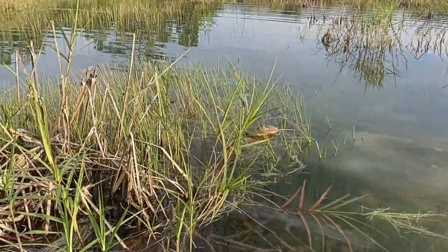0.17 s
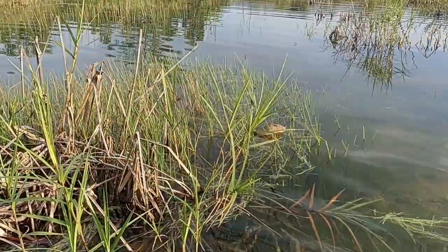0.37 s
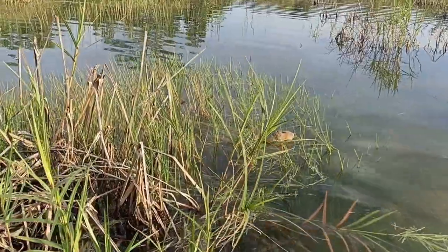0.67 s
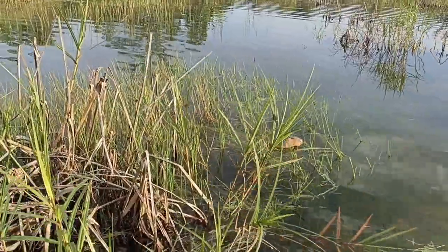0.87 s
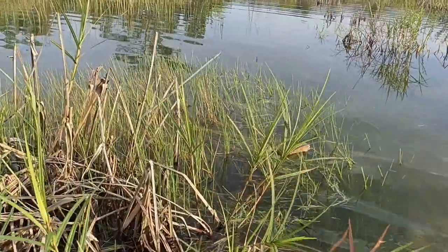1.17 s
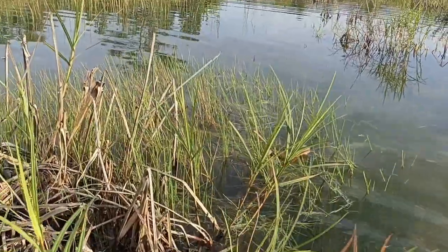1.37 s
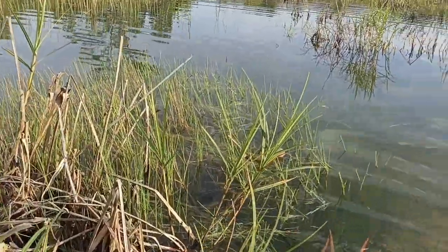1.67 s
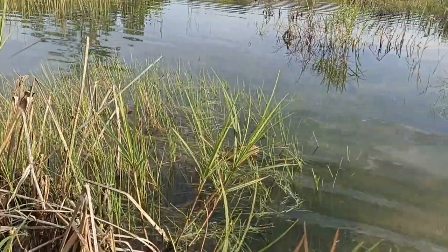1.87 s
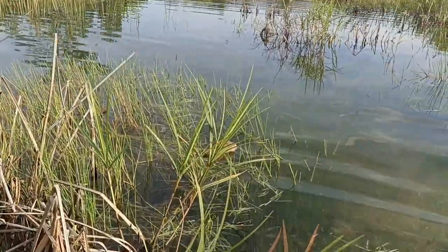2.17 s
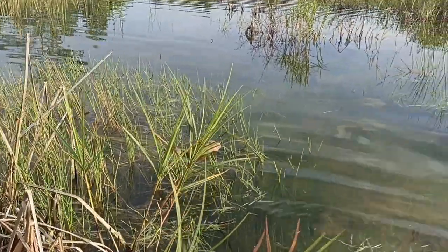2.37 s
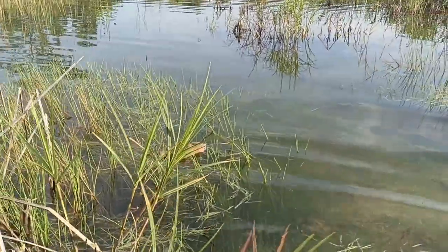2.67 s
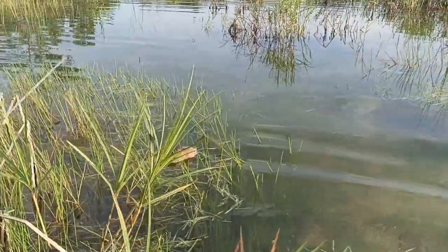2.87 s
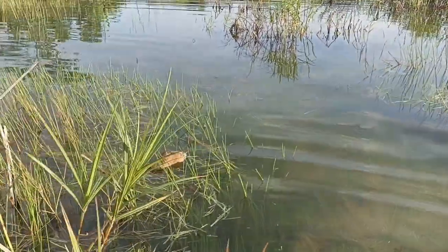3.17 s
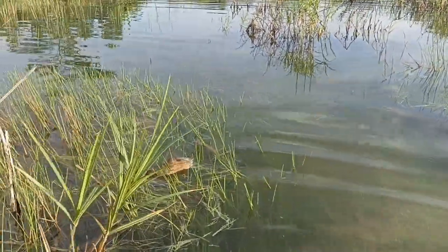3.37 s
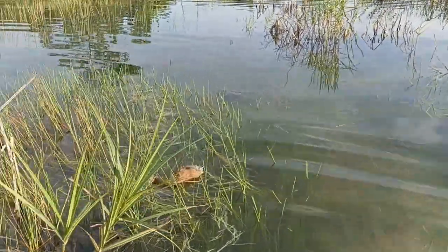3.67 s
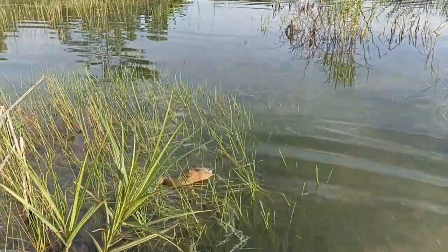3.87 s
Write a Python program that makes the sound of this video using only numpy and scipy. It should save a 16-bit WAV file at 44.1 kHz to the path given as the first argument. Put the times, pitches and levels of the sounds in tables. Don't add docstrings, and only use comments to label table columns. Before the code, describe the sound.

At a reedy pond outdoors, a distant engine and traffic rumble runs steadily under a soft wash of far frogs and a thin high insect hiss. A small bird gives brief bent whistles, tumbling around one second and again soon after. A dry stem snaps faintly, then a nearby frog fires five quick, dry rattles, strongest on the right. A soft thud from handling ends the wide stereo take.

```python
import sys
import numpy as np
from scipy import signal
from scipy.fft import rfft, irfft
from scipy.io import wavfile
from scipy.ndimage import uniform_filter1d

SR = 44100
rng = np.random.default_rng(int(sys.argv[2]) if len(sys.argv) > 2 else 0)


def voltage_ratio(level):
    return 10 ** (np.asarray(level, float) / 20)


def dump_mix(stems):
    frames = np.atleast_2d(stems).T
    limited = np.clip(frames, -1, 1)
    pcm = np.round(limited * 32767).astype(np.int16)
    wavfile.write(sys.argv[1], SR, pcm)


N = 177458


def frog():
    # (first_ms, middle_ms,
    # closing_ms)
    calls = [
        (2.7400, -30, 2.53, 2.18, 1.38),
        (2.8864, -30, 1.73, 2.55, 1.65),
        (3.0362, -30, 1.72, 2.7, 1.4),
        (3.1913, -28.5, 1.95, 2.45, 1.45),
        (3.3492, -29, 2, 2.35, 1.4),
    ]
    # pitch_hz, time to fall 60 dB (t60_s), left_db, right_db
    ringing = [(3516, 0.015, -13, 2), (3540, 0.01, -26, -9.5), (3150, 0.0072, -9.5, -1),
               (2600, 0.011, -22, -6.5), (4240, 0.0093, -4.5, -11), (1930, 0.0062, -23, -17),
               (1510, 0.0079, -10, -7), (1180, 0.0094, -17, -12)]
    fade_db, tiring_db_per_s = -3, -5.5
    pulses = np.zeros(N)
    k = np.arange(22)
    for s, db, first, middle, closing in calls:
        chance = rng.standard_normal((22, 2))
        gap_numbers = [1, 3, 4, 6, 7.5, 12, 20]
        gaps_ms = [first, middle, .95 * middle, .75 * middle, 1.05 * closing, .95 * closing, 1.13]
        spacing = np.interp(k, gap_numbers, gaps_ms)
        jitter_ms = 0.029 * chance[:, 0] * (k > 0)
        at = s + (np.cumsum(spacing) - spacing + jitter_ms) / 1000
        call_fade_db = (fade_db + tiring_db_per_s * (s - calls[0][0])) * k / 12
        trail_db = np.where(k > 12, -3.5 - 0.88 * (k - 12), 0)
        pulse_db = db + call_fade_db + trail_db + 1.8 * chance[:, 1]
        pulses[np.round(at * SR).astype(int)] = voltage_ratio(pulse_db)

    t = np.arange(1500) / SR
    damping = np.array([[1.4], [1]])
    ring = np.zeros((2, len(t)))
    for hz, t60, left_db, right_db in ringing:
        level_db = np.array([[left_db], [right_db]]) - 60 * t * damping / t60
        ring += voltage_ratio(level_db) * np.sin(2 * np.pi * hz * t)
    sac_band = signal.cheby2(6, 40, [750, 4950], "band", fs=SR, output="sos")
    ring = signal.sosfilt(sac_band, ring)
    ring = 1.68 * np.diff(ring, prepend=0)
    ports = signal.fftconvolve(pulses[None], ring, axes=1)[:, :N]
    ports = np.array([ports[0], delayed(ports[1], 13.07)])
    return ports + voltage_ratio(-12.5) * bank(ports, t60=0.14)


def bird():
    # start_s, length_s, middle_hz, peak_db
    rises = [(0.041, 0.014, 3600, -48), (0.054, .01, 2780, -46), (.198, .013, 2350, -49),
             (0.237, 0.015, 3550, -42.5), (1.672, .008, 3520, -46), (1.682, .009, 2560, -51),
             (1.692, 0.0082, 2320, -46.5), (1.707, 0.028, 3270, -46), (1.842, .006, 3650, -54),
             (2.394, 0.013, 2380, -50), (2.552, 0.022, 3250, -48.5), (2.656, 0.0054, 3070, -51),
             (2.872, .008, 2510, -51), (3.092, 0.0097, 2920, -43), (3.11, .014, 3160, -40),
             (3.124, 0.019, 2450, -45), (3.156, 0.017, 2330, -50), (3.272, .01, 3500, -50),
             (3.279, .011, 2720, -44.5), (3.385, .012, 2265, -48), (3.406, 0.019, 2320, -43),
             (3.43, 0.0081, 2600, -45)]
    # start_s, length_s, middle_hz, peak_db
    falls = [(1.69, .008, 3080, -51), (1.849, .007, 3650, -46), (1.677, .006, 3600, -50),
             (1.835, .01, 1970, -50), (2.606, 0.018, 3210, -49), (2.718, .034, 3260, -50.5),
             (3.101, .007, 3030, -41), (3.135, .008, 3050, -42), (3.142, 0.0109, 2520, -39),
             (3.266, .0052, 2700, -46), (3.4, .006, 2550, -48), (3.442, .005, 2660, -41)]
    # start_s, length_s, middle_hz, ends_minus_middle_hz, peak_db
    bends = [(2.575, .012, 2460, 12, -48.5), (0.061, 0.016, 3690, -270, -48), (.22, .013, 2420, -150, -48),
             (0.256, 0.028, 2530, 180, -48.5), (0.573, 0.076, 2730, -23, -57),
             (0.64, 0.026, 2600, -350, -51), (.953, 0.018, 2600, 15, -47.5),
             (1.231, .009, 3790, 170, -48.5), (1.247, 0.016, 3490, 110, -53),
             (1.258, .017, 2600, -250, -52), (1.274, 0.017, 3390, 120, -50),
             (1.815, 0.014, 2355, -80, -46.5), (1.86, 0.02, 2650, -600, -49.5),
             (1.88, 0.02, 3150, 300, -55), (1.886, 0.0086, 2480, -390, -50),
             (2.59, 0.014, 2540, -15, -48.5), (2.586, 0.02, 3300, 162, -45.5),
             (2.628, 0.027, 2300, 380, -50.5), (2.66, 0.024, 2560, 920, -47.5),
             (2.685, .027, 3130, 450, -48.5), (2.915, 0.044, 3300, -80, -43.5),
             (3.289, 0.016, 3400, -130, -49.5), (3.441, 0.039, 2342, -8, -41)]
    # start_s, stretch (times as long), level_db
    tumbles = [
        (.954, .98, -46),
        (1.417, 1.02, -44),
    ]
    flutter, quiver = wandering(span=90), wandering(span=90)
    sung = [note(*row, sweep_hz=500, bend_hz=-6000 * row[1]) for row in rises]
    sung += [note(*row, sweep_hz=-780, bend_hz=30) for row in falls]
    sung += [note(s, length, hz, db, 0, bend_hz) for s, length, hz, bend_hz, db in bends]
    sung += [tumble(*row) for row in tumbles]

    song = np.zeros(N)
    for s, hz, db in sung:
        hz = hz * (1 + .006 * quiver[round(s * SR):][:len(hz)])
        edges = signal.windows.tukey(len(hz), min(0.003 * SR / len(hz), .6))
        whistle = np.sin(2 * np.pi * np.cumsum(hz) / SR)
        add(song, s, voltage_ratio(db) * edges * whistle)
    t = np.arange(N) / SR
    song *= voltage_ratio(np.interp(t, [1.9, 2.5], [2.4, 1.1]) * flutter)
    ports = np.array([voltage_ratio(-14.0) * song, delayed(song, 22.15)])
    echo_db = np.interp(t, [1.9, 2.5], [-9, -13])
    return ports + voltage_ratio(echo_db) * bank(ports, t60=.1)


def note(s, length, hz, db, sweep_hz, bend_hz):
    u = np.linspace(-1, 1, round(length * SR))
    pitch_hz = hz + sweep_hz / 2 * u + bend_hz * u ** 2
    release_db = -9 * ((u + 1) / 2) ** 4 * min(length / .04, 1) ** 2
    return s, pitch_hz, db + release_db


def tumble(s, stretch, db):
    # time_ms, pitch_hz, level_db
    phrase = [
        (0, 3250, -1),
        (7, 4000, 0.5),
        (11, 3230, -4),
        (16, 4200, -4),
        (24, 3150, 1.5),
        (32, 3700, -1),
        (47, 2850, -10),
        (59, 2060, -1),
        (71, 2620, -3),
    ]
    ms, hz, shape_db = np.transpose(phrase)
    now = np.arange(0, ms[-1], 1000 / SR / stretch)
    pitch_hz = uniform_filter1d(np.interp(now, ms, hz), size=70)
    return s, pitch_hz, db + np.interp(now, ms, shape_db)


def bank(x, t60):
    taps = np.zeros((2, 12000))
    at = np.arange(400, 11980, 20) + rng.integers(0, 20, (2, 579))
    np.put_along_axis(taps, at, rng.choice([-1., 1.], at.shape), 1)
    taps *= voltage_ratio(-60 * np.arange(12000) / SR / t60)
    return signal.fftconvolve(x, taps / np.linalg.norm(taps[0]), axes=1)[:, :N]


def reeds():
    # start_s, level_db, length_s, low_edge_hz, high_edge_hz
    snaps = [
        (2.5793, -51, .002, 3500, 10000),
        (2.580, -48.5, .008, 10500, 16000),
        (1.508, -66, .006, 5000, 13000),
        (2.553, -60, .003, 3500, 6500),
        (.03, -57, .003, 3600, 6000),
        (.6, -60, .002, 4000, 6000),
    ]
    # start_s, pitch_hz, level_db, time to fall 60 dB (t60_s)
    bump = (3.832, 290, -34, .06)
    out = np.zeros((2, N))
    for s, db, length, *edges_hz in snaps:
        puff = rng.standard_normal(600) * (np.arange(600) < length * SR)
        puff = signal.sosfilt(signal.butter(2, edges_hz, "band", fs=SR, output="sos"), puff)
        right_extra_db = 5.0 if edges_hz[0] < 1e4 else -13.0
        add(out, s, voltage_ratio(np.array([[db], [db + right_extra_db]])) * puff)
    s, hz, db, t60 = bump
    t = np.arange(3000) / SR
    onset = 1 - np.exp(-t / 0.0011)
    add(out, s, voltage_ratio(db - 60 * t / t60) * np.sin(2 * np.pi * hz * t) * onset)
    return out


def insects():
    # pitch_hz, then left_db and right_db (dB per Hz)
    hiss_color = [(7340, -135, -120), (7170, -111, -103), (8320, -99, -92), (8635, -99, -94),
                  (8870, -106, -105), (9480, -121, -121), (9100, -121, -123), (10480, -116, -123),
                  (11930, -105, -113), (12600, -105, -115), (14000, -106, -110), (15500, -104, -105),
                  (15700, -125, -125)]
    # time_s, throb_depth_db
    in_step = [(0, 1.5), (.45, 2.2), (.85, .9), (1.3, 2), (1.85, .9), (2.25, 2.6), (3.0, 1.8), (3.3, 2.8),
               (4.02, 2.6)]
    throb_per_s, crest_s = 6.06, 2.035
    t = np.arange(N) / SR
    throb_db = np.interp(t, *np.transpose(in_step)) * np.cos(2 * np.pi * throb_per_s * (t - crest_s))
    hiss = noise(hiss_color, patchy_db=1.2, flicker_db=-0.17, size=512)
    high = signal.sosfiltfilt(signal.butter(4, 10000, "high", fs=SR, output="sos"), hiss)
    return hiss + high * (voltage_ratio(throb_db) - 1)


def chorus():
    # pitch_hz, then left_db and right_db (dB per Hz)
    wash_color = [(900, -120, -110), (1320, -106, -96.5), (2050, -99, -89.5), (2920, -102, -92.5),
                  (3300, -99, -90.5), (3530, -101, -88), (3795, -103, -93), (4250, -107, -104),
                  (5080, -110, -109), (5840, -112, -104), (7060, -115, -102), (6930, -125, -107),
                  (7860, -140, -130)]
    # time_s, level_db
    wash_swell = [(0.0, -59), (0.4, -61), (0.86, -60.5), (1.72, -59.3), (2.04, -61.5), (3.41, -60.5),
                  (3.5, -62), (4.02, -63.5)]
    s, level_db = np.transpose(wash_swell)
    swell_db = np.interp(np.arange(N) / SR, s, level_db - level_db.mean())
    return voltage_ratio(swell_db) * noise(wash_color, patchy_db=1.78, flicker_db=0.8, size=512)


def drone():
    # pitch_hz, left_db and right_db (dB per Hz), left-right likeness (0-1)
    rumble = [(25.7, -94, -107, 0.7), (50.3, -98, -76.5, .95), (68.6, -79.5, -84, 1), (88, -64.5, -64.5, 1),
              (165, -67, -66.5, 0.94), (295, -69, -70.5, 0.92), (441, -79, -79.5, 0.48),
              (577, -86, -82.5, 0.48), (910, -92, -88.5, 0.86), (1236, -95, -87.5, 0.68),
              (1530, -95.5, -91.5, 1), (2300, -108, -100, 0.6), (3000, -125, -120, 0.9)]
    low = noise(rumble, patchy_db=1.24, flicker_db=0.25, size=2048) + engine()
    return np.array([delayed(low[0], 13.96), low[1]])


def engine():
    # time_s, level_db
    exhaust = [(0, -55.5), (.15, -47.5), (.27, -52.5), (.45, -43.5), (.93, -57), (1.22, -45.5), (1.4, -51),
               (1.9, -44), (2.1, -54), (2.5, -44.5), (2.67, -51.5), (2.95, -46.5), (3.2, -52),
               (3.45, -49.5), (4.02, -48.5)]
    # order (multiple of shaft speed), level_db, share of the exhaust swell (0-1),
    # random fading_db
    orders = [(5, -52.5, 0.01, 3.5), (6, -51.5, 0, 4), (9, -47.5, 1, 0.3), (10, -56, 0.47, 2.5),
              (18, -57.5, 0.47, 3)]
    shaft_hz, fade_s = 17.05, 0.098
    s, level_db = np.transpose(exhaust)
    swell_db = np.interp(np.arange(N) / SR, s, level_db - level_db.mean())
    turns = np.cumsum(shaft_hz * (1 + 0.00646 * wandering(span=9000))) / SR
    out = np.zeros(N)
    for k, db, share, fade_db in orders:
        hum_db = db + share * swell_db + fade_db * wandering(int(fade_s * SR))
        out += np.sqrt(2) * voltage_ratio(hum_db) * np.sin(2 * np.pi * (round(k) * turns + rng.random()))
    return out


def noise(table, patchy_db, flicker_db, size):
    f, *columns = np.transpose(table)
    white = rng.standard_normal((2, N + size))
    hz, t, z = signal.stft(white, SR, nperseg=size, noverlap=size * 3 // 4)
    left_db, right_db, *same = (np.interp(np.log(hz + 1), np.log(f), c)[:, None] for c in columns)
    if same:
        like = np.clip(same[0], 0, 1)
        z[1] = like * z[0] + np.sqrt(1 - like ** 2) * z[1]
    patches = uniform_filter1d(rng.standard_normal(z.shape[1:]), size=9, axis=0)
    patches = evened(uniform_filter1d(patches, size=9, axis=1))
    flicker = evened(uniform_filter1d(rng.standard_normal(len(t)), size=4))
    inside = ((hz > .7 * f[0]) & (hz < 1.3 * f[-1]))[:, None]
    level_db = np.array([left_db, right_db]) + patchy_db * patches + flicker_db * flicker
    z *= inside * voltage_ratio(level_db) * np.sqrt(SR / 2)
    return signal.istft(z, SR, nperseg=size, noverlap=size * 3 // 4)[1][:, :N]


def wandering(span):
    smooth = uniform_filter1d(rng.standard_normal(N), size=span)
    return evened(uniform_filter1d(smooth, size=span))


def evened(x):
    return x / np.sqrt(np.mean(x ** 2) + 1e-20)


def delayed(x, samples):
    turn = np.exp(-2j * np.pi * np.fft.rfftfreq(x.shape[-1]) * samples)
    return irfft(rfft(x) * turn, x.shape[-1])


def add(mix, s, sound):
    part = mix[..., round(s * SR):][..., :sound.shape[-1]]
    part += sound[..., :part.shape[-1]]


def scene():
    return frog() + bird() + reeds() + insects() + chorus() + drone()


def muted(x):
    # pitch_hz, threshold_db (dB per Hz)
    threshold = [(4000, -122), (4800, -111), (5500, -113), (7000, -114), (8000, -120), (9100, -114),
                 (10400, -115), (11300, -117), (12200, -126)]
    hz, t, z = signal.stft(x, SR, nperseg=2048, noverlap=1536)
    bands = z[:, :1024].reshape(2, 256, 4, -1)
    power = uniform_filter1d((abs(bands) ** 2).mean(2), size=3, axis=2) * 2048 / .75 / SR
    chance = rng.standard_normal((2, 43, len(t))) + .6 * rng.standard_normal((43, len(t)))
    waver = np.repeat(evened(uniform_filter1d(chance, size=4, axis=2)), 6, axis=1)[:, :256]
    limit_db = np.interp(hz[2:1024:4], *np.transpose(threshold), left=-200, right=-200)[:, None]
    limit_db = limit_db + 4.5 * waver
    z[:, :1024] *= np.repeat(10 * np.log10(power + 1e-30) > limit_db, 4, axis=1)
    return signal.istft(z, SR, nperseg=2048, noverlap=1536)[1][:, :N]


def roll_off(x):
    return signal.sosfilt(signal.butter(12, 15620, fs=SR, output="sos"), x)


def record(dry):
    mix = muted(dry)
    return roll_off(mix)


dry = scene()
out = record(dry)
dump_mix(out)
```